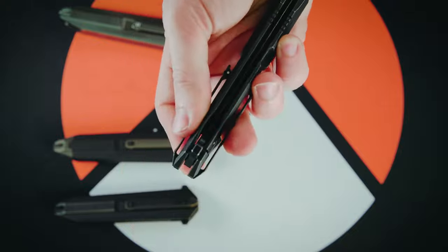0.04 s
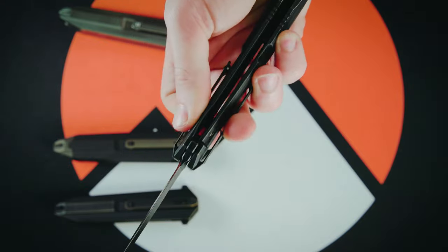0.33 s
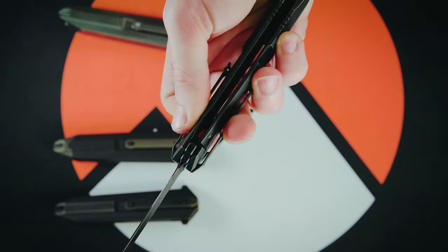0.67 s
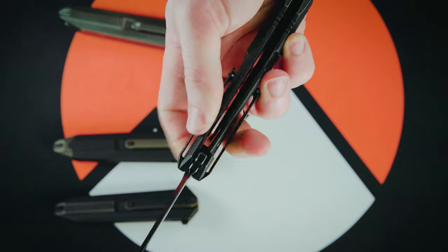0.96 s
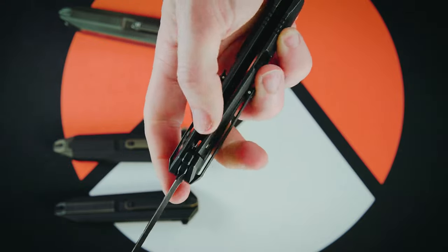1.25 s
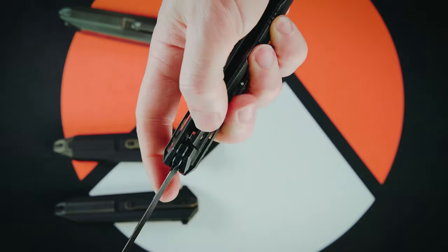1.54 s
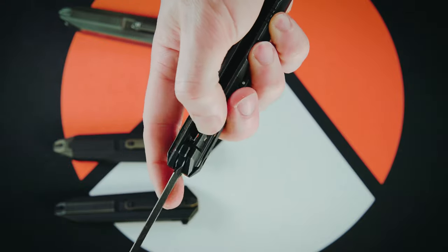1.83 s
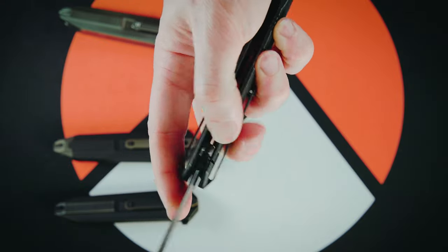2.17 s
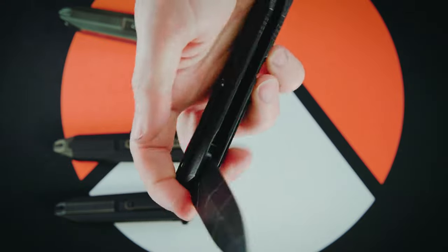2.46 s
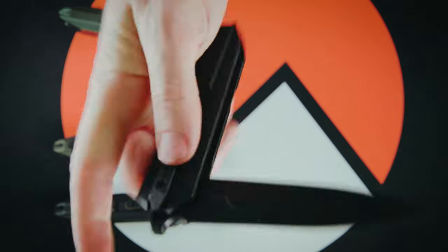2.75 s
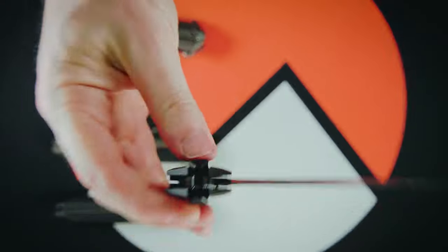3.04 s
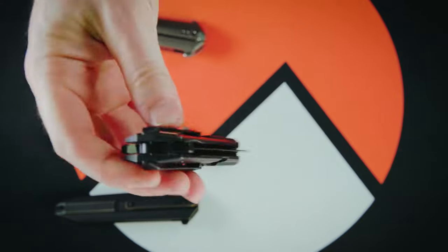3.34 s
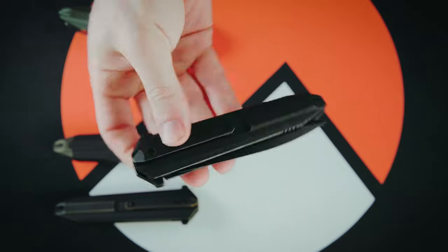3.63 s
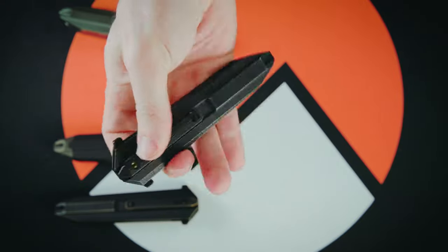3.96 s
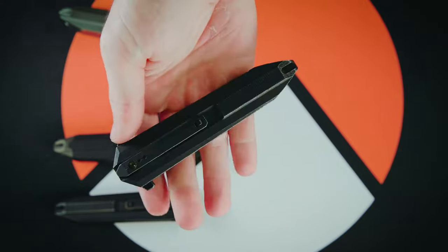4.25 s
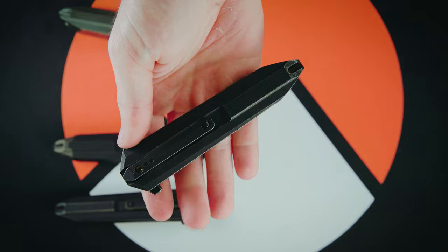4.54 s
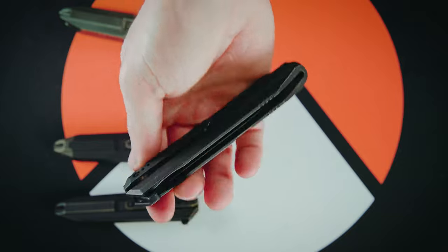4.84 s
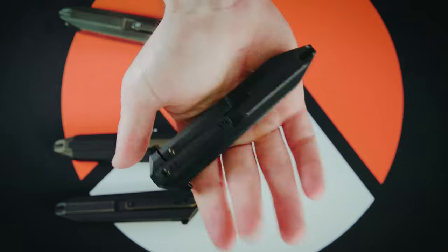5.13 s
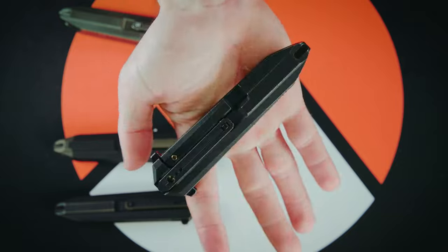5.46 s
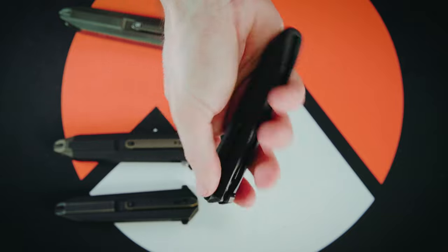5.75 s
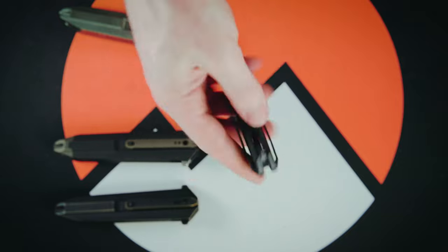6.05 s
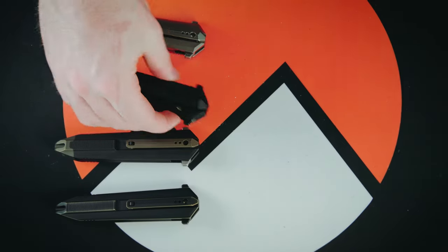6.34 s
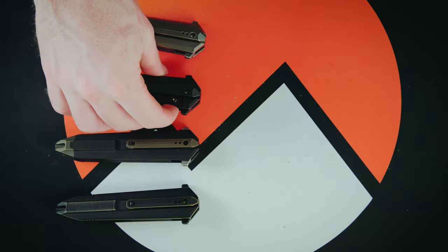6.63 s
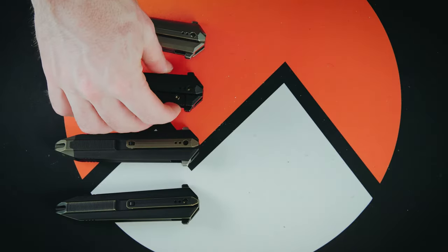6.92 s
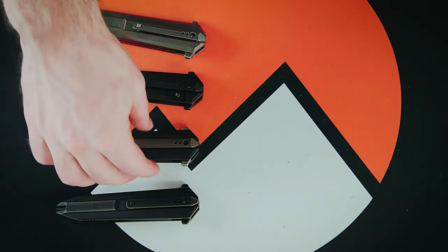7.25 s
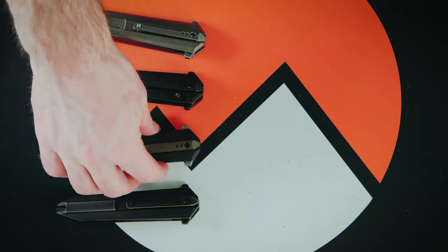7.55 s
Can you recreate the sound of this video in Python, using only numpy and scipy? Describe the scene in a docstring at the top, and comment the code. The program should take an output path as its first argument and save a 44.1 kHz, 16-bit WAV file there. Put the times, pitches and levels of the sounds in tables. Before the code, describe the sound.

A folding knife is handled close to the microphone in a quiet, bare room, with a faint low hum and a distant drone throughout. At about 0.2 seconds the blade swishes briefly and snaps open with a sharp, ringing steel click and a short room echo. Fingers tick lightly on the handle. At 1.9 seconds the lock is pushed aside with a smaller metallic click, followed by soft rubs and ticks. At 3.2 seconds the blade swings shut with a loud snap, and at 3.9 seconds another sharp click presses it home. Only faint finger rubbing and small taps follow. From about 6.7 seconds the knife is laid on a padded table with soft, low thuds and light ticks. Around 7.5 seconds a few more gentle thuds and clicks sound as another knife is touched.

```python
"""A folding knife, close to the microphone in a quiet, bare room; a low hum and a distant drone run throughout.
At 0.2 s the blade swishes round its pivot and snaps open, steel ringing on steel. At 1.9 s the lock
is pushed aside; at 3.2 s the blade swings home, and at 3.9 s it is pressed shut. Fingers rub and tick
on the handle in between and afterwards. From 6.7 s the knife is laid on a padded table with soft
thuds, and the next one is touched."""
import sys
import numpy as np
from scipy import signal
from scipy.fft import rfft, irfft
from scipy.io import wavfile
from scipy.ndimage import uniform_filter1d

SR = 44100
rng = np.random.default_rng(int(sys.argv[2]) if len(sys.argv) > 2 else 0)


def store_pcm(level_fs):
    """Save levels as 16-bit WAV."""
    pcm = np.round(np.clip(level_fs, -1, 1) * 32767).astype(np.int16)
    wavfile.write(sys.argv[1], SR, np.atleast_2d(pcm).T)


N = 334719
TIME = np.arange(N) / SR
BINS_HZ = np.fft.rfftfreq(8192, 1 / SR)


def from_db(db):
    """Decibels to gain."""
    return 10 ** (np.asarray(db) / 20)


def unit_energy(x):
    """Scale to a sum of squares of one."""
    return x / np.sqrt(np.sum(x ** 2) + 1e-20)


def add(track, s, sound):
    """Mix a sound into a track at a time."""
    stretch = track[int(round(s * SR)):][:len(sound)]
    stretch += sound[:len(stretch)]


def through(x, response):
    """Pass a signal through an impulse response."""
    return signal.oaconvolve(x, response)[:N]


def spectrum(points):
    """Gains at BINS_HZ from (f/Hz, level/dB) points joined on a log-frequency axis."""
    hz, db = np.transpose(points)
    return from_db(np.interp(np.log(np.maximum(BINS_HZ, 1)), np.log(hz), db))


def resonances(modes):
    """Gains at BINS_HZ of steep-sided resonances (f/Hz, half-width/Hz, level/dB)."""
    peaks = (from_db(db) / (1 + ((BINS_HZ - hz) / width) ** 2) for hz, width, db in modes)
    return np.sqrt(sum(peak ** 2 for peak in peaks))


def causal(gains):
    """Minimum-phase response of unit energy, shaped by gains at BINS_HZ."""
    cepstrum, half = irfft(np.log(gains + 1e-9)), len(gains) - 1
    cepstrum[1:half] *= 2
    cepstrum[half + 1:] = 0
    return unit_energy(irfft(np.exp(rfft(cepstrum))))


def excite(drive, gains, smooth_bins=45):
    """A burst rings a body; its spectrum is evened out, so the body sets the timbre."""
    power = np.abs(rfft(drive, 2 * len(BINS_HZ) - 2)) ** 2
    ripple = np.sqrt(uniform_filter1d(power, smooth_bins) + 1e-18)
    ringing = signal.fftconvolve(drive, causal(gains / ripple))
    return np.linalg.norm(drive) * unit_energy(ringing)


def swell(peak_s, length_s, ease):
    """A gain that rises to one and falls, above one half for length_s; more ease, shorter skirts."""
    return 1 / (1 + np.abs(2 * (TIME - peak_s) / length_s) ** (2 * ease))


def drift(rate_hz):
    """Slow random motion with a spread near one."""
    return np.interp(TIME * rate_hz % 63, np.arange(64), rng.standard_normal(64))


def wavering_tone(hz, waver):
    """A steady or gliding tone that wavers in level and phase; rms near one."""
    wobble = (1 + waver * (drift(5.9) + 1j * drift(3.5))) / np.sqrt(1 + waver ** 2)
    cycles = np.cumsum(hz * np.ones(N)) / SR + rng.random()
    return np.sqrt(2) * np.real(wobble * np.exp(2j * np.pi * cycles))


# appliance hum in the room: [f/Hz, rms level/dB, waver/0-1]
HUM_LINES = [(59.3, -56.5, .12), (119.7, -73.5, .6), (216.5, -79, .5), (239.3, -69, .45), (360.4, -85, .4),
             (473, -79.5, .5)]


def hum():
    """An appliance hums in a few low, wavering tones."""
    return sum(from_db(db) * wavering_tone(hz, waver) for hz, db, waver in HUM_LINES)


# speed of the far-off drone: [t/s, turns per second/Hz]
DRONE_SPEED = [(0, 19.3), (2.2, 20.45), (3.3, 21), (4.6, 20.95), (6.5, 20.3)]
# its partials: [multiple of the speed, steady level/dB, level of the added swell/dB]
DRONE_PARTIALS = [(2, -78, -78), (3, -61.5, -85), (4, -67.5, -66), (5, -72, -64.5), (7, -86, -75)]


def drone():
    """A low drone, like a distant engine, swells once, speeds up a little and eases."""
    speed = np.interp(TIME, *np.transpose(DRONE_SPEED))
    rise = swell(peak_s=2.1, length_s=1.7, ease=1.5)
    return sum((from_db(db) + from_db(swell_db) * rise) * wavering_tone(order * speed, waver=.25)
               for order, db, swell_db in DRONE_PARTIALS)


# room tone at the microphone: [f/Hz, relative level/dB]
AIR_SPECTRUM = [(15, -64), (25, -50), (40, -23.5), (64, -13.5), (87, -19.5), (120, -23), (149, -26),
                (206, -26), (242, -24.5), (384, -32.5), (476, -32.5), (754, -38), (911, -40), (1610, -45),
                (4000, -47.5), (16000, -51.5)]


def room_tone(hiss_db=-73.5):
    """Steady rumble and hiss; hiss_db is the rms of the part above 1 kHz."""
    air = through(rng.standard_normal(N), causal(spectrum(AIR_SPECTRUM)))
    hiss = signal.sosfilt(signal.butter(4, 1000, "high", fs=SR, output="sos"), air)
    return from_db(hiss_db) * air / hiss.std()


def friction(grain_db):
    """Surface grains catch and let go: noise of rms one whose level jumps every 32 samples."""
    roughness = np.repeat(rng.standard_normal(N // 32 + 1), 32)[:N]
    grains = rng.standard_normal(N) * from_db(grain_db * roughness)
    return grains / grains.std()


# colour of the pivot close up, opening and closing: [f/Hz, half-width/Hz, relative level/dB]
PIVOT_OPENING_MODES = [(2160, 49, 1), (3750, 120, -4.5), (4030, 170, 4), (4950, 300, -7), (6230, 380, -1),
                       (8250, 6000, -19.5), (11500, 350, -15)]
PIVOT_CLOSING_MODES = [(2200, 130, -1), (4100, 330, -0.5), (5000, 350, -1), (6550, 220, 2),
                       (7000, 4500, -11.5), (11500, 200, 2), (13200, 500, -8)]


def pivot(modes, start_s, stop_s, run_up_s, full_speed_db, grain_db):
    """The detent ball drags on the turning blade, louder as it speeds up, until the blade stops."""
    speed = np.clip((TIME - start_s) / run_up_s, 0, 1) * (TIME < stop_s)
    drag = friction(grain_db) * from_db(full_speed_db) * speed ** 1.9
    return through(drag, causal(resonances(modes)))


def chatter(t60, size=4096):
    """A dying burst of microscopic impacts with unit energy."""
    return unit_energy(rng.uniform(-1, 1, size) * from_db(-60 * TIME[:size] / t60))


# touches of fingers and parts: [t/s, tap level/dB, ring level/dB, favoured f/Hz, t60/s]
FINGER_TOUCHES = [(.167, -34, -24, 6400, .02), (.2005, -35, -15, 4150, .015), (.2075, -32, -12, 4150, .03),
                  (.907, -39, -35, 4215, .031), (.93, -43, -40, 5810, .055), (1.115, -56, -45.5, 4220, .13),
                  (1.581, -36.5, -44, 2383, .036), (1.889, -32, -31, 2700, .037),
                  (1.8914, -32, -21.5, 2710, .035), (2.134, -42.5, -36.5, 4030, .02),
                  (2.18, -42, -37.5, 2185, .07), (2.306, -43, -35, 4260, .022),
                  (2.387, -48, -36, 2170, .12), (2.672, -42, -41, 6470, .033),
                  (2.687, -37.5, -35, 8000, .026), (2.897, -50, -43, 5620, .047),
                  (3.74, -50, -42, 6300, .045), (5.667, -55, -45, 5340, .015), (5.81, -52, -46, 1680, .04),
                  (5.879, -53, -45, 1680, .03), (6.118, -46, -48, 3600, .05),
                  (6.171, -42.5, -41, 8200, .065), (6.236, -47, -44, 4110, .02),
                  (6.481, -48.5, -39, 4100, .012), (6.892, -34.5, -53, 4200, .13),
                  (6.924, -41, -55, 5700, .1), (6.966, -42, -47, 1290, .024),
                  (7.474, -31.5, -45.5, 4130, .1), (7.531, -36.5, -35, 5400, .13),
                  (7.568, -37.5, -39, 1490, .023)]
# colour of a dry tap: [f/Hz, relative level/dB]
TAP_SPECTRUM = [(200, -8.5), (500, -4), (1200, 2.5), (2500, 0), (4200, 2.5), (6000, -4.5), (8500, -10),
                (12000, -19), (16000, -29)]
# light ringing of the handle: [f/Hz, half-width/Hz, relative level/dB]
HANDLE_RING = [(2200, 46, -8.5), (3600, 400, -11), (4080, 85, 1.5), (4350, 110, -2), (5432, 170, -6),
               (6260, 120, -5.5), (8060, 740, -15)]


def finger_ticks(ping_width_hz=67, ping_db=9.5):
    """Each touch gives a dry tap and rings the handle, favouring one partial."""
    out, handle, tap = np.zeros(N), resonances(HANDLE_RING), spectrum(TAP_SPECTRUM)
    for s, tap_db, ring_db, hz, t60 in FINGER_TOUCHES:
        burst = chatter(t60)
        ping = resonances([(hz, ping_width_hz, ping_db)])
        add(out, s, from_db(tap_db) * excite(burst, tap))
        add(out, s, from_db(ring_db) * excite(burst, handle + ping))
    return out


# decay of the bare room: [f/Hz, t60/s]
ROOM_DECAY = [(100, .5), (500, 0.59), (1200, .72), (4000, 0.63), (6000, .6), (8000, .51), (11000, .43),
              (16000, 0.37)]
# reflections gathering after the direct sound: [t/s, relative level/dB]
ROOM_ONSET = [(0, -31.5), (.005, -5.5), (.017, -7.5), (.03, 0.5), (.045, 1), (.09, 0.5)]


def room(x):
    """Diffuse reflections gather at the microphone within 30 ms and die soonest in the top treble."""
    t, hz = TIME[:SR], np.fft.rfftfreq(SR, 1 / SR)
    onset = from_db(np.interp(t, *np.transpose(ROOM_ONSET)))
    centres, decays = np.transpose(ROOM_DECAY)
    white, tail = rfft(rng.standard_normal(SR)), 0
    for t60, share in zip(decays, np.eye(len(centres))):
        band = irfft(white * np.interp(hz, centres, share))
        tail = tail + band * unit_energy(from_db(-60 * t / t60) * onset)
    return through(x, unit_energy(tail))


# steel contacts of each action: [t/s, level/dB, chatter t60/s]
OPEN_CONTACTS = [(.2171, 4.5, 0.01), (.2197, 8.5, 0.013), (.2222, 8, 0.012), (.2255, -9, 0.01)]
UNLOCK_CONTACTS = [(1.8975, -22, .03), (1.9004, -8, .012), (1.9017, -3.5, 0.015), (1.9042, -6.5, 0.018)]
CLOSE_CONTACTS = [(3.2057, 11.2, 0.0099), (3.2072, -2.5, .035)]
SEAT_CONTACTS = [(3.8672, -33.5, .08), (3.8709, 7, .007), (3.8728, -2, .035), (3.8748, -1, .035),
                 (3.8771, -3, .035), (3.8838, -15.5, .025)]
# ringing of the open knife, the lock bar, the folded knife and the blade in its seat:
# [f/Hz, half-width/Hz, relative level towards the microphone/dB, relative level into the room/dB]
OPEN_RING = [(610, 320, -24.5, -37.5), (980, 180, -15, -19), (1730, 250, -11.5, -12.5),
             (2200, 82, -10.5, -17), (2600, 200, -12.5, -8), (3680, 300, -5.5, -0.5), (4220, 150, -6, -1.5),
             (4720, 560, -19, -7.5), (5700, 550, -8.0, -4), (6290, 160, -1.0, -3.5),
             (6620, 150, -3.0, -5.5), (7370, 150, -10, -8), (8083, 160, -8.5, -5.5),
             (8830, 470, -11.5, -10.5), (10000, 470, -13.0, -18.0), (11100, 290, -17.5, -21),
             (11700, 730, -20.5, -20.0), (13320, 1060, -32.0, -30.5), (14800, 590, -28.5, -30.5)]
LOCK_RING = [(410, 93, -33, -31), (1570, 280, -26.5, -18.5), (2250, 145, -8.5, -8.5),
             (2750, 310, -13.5, -11), (3610, 180, -10, -5.5), (4200, 110, -5, -2.5), (4530, 150, -0.5, 2.5),
             (4840, 150, -10, -0.5), (5660, 300, -8.5, -8), (6500, 890, -19.5, -17.0),
             (7480, 170, -21.5, -17.5), (8180, 320, -16, -17.5), (9640, 1020, -29, -27.5),
             (11680, 690, -34.0, -34.0), (12820, 750, -35.0, -31.5)]
FOLDED_RING = [(695, 3300, -27, -24.5), (1115, 180, -17, -18), (2122, 320, -16, -18.5),
               (3330, 440, -13, -15), (3790, 90, -60.0, -0.5), (3970, 200, -6, -1.5), (4930, 180, -8, -1.5),
               (5170, 120, -8, -6.5), (5885, 150, -3.5, -6.0), (6990, 600, -4.5, -8.5),
               (7220, 172, -1, -19), (7900, 190, -7.5, -58), (8650, 690, -10.5, -14),
               (9956, 560, -16.5, -26), (11600, 1150, -19, -25.0), (13340, 120, -28, -23.5),
               (14620, 1200, -32, -33.5)]
SEAT_RING = [(390, 320, -28, -24.5), (1210, 80, -18, -17.5), (2120, 1100, -23, -24.5), (3140, 99, -20, -30),
             (3660, 155, -6, -5.0), (4200, 74, 1.5, -60.0), (4270, 310, -60.0, -0.5), (4540, 126, -6, -2.5),
             (5940, 620, -15, -8), (6100, 190, -10.5, -60.0), (6770, 145, -8.5, -28), (7860, 650, -11, -13),
             (8480, 120, -13, -18), (9880, 590, -23.5, -25), (11500, 660, -20.5, -24),
             (12490, 320, -25.5, -26.0), (13000, 450, -20, -23.0), (14700, 760, -35, -34.0)]


def snap(contacts, modes, room_db, tick_db):
    """Steel hits steel close up: each contact, a tick and a chatter, rings the knife; the room answers."""
    start, drive = contacts[0][0], np.zeros(4096)
    for s, db, t60 in contacts:
        blow = chatter(t60)
        blow[0] += from_db(tick_db) * rng.choice([-1, 1])
        add(drive, s - start, from_db(db) * unit_energy(blow))
    hz, width, near_db, far_db = np.transpose(modes)
    near, far = np.zeros((2, N))
    add(near, start, excite(drive, resonances(zip(hz, width, near_db))))
    # the room gathers sound from all directions, which fills the notches between the contacts
    add(far, start, excite(drive, resonances(zip(hz, width, far_db)), smooth_bins=13))
    return near + from_db(room_db) * room(far)


# knocks in the palm: [t/s, f/Hz, level/dB, t60/s]
PALM_KNOCKS = [(.2195, 233.3, -44.5, .05), (3.206, 238.4, -46.5, 0.078), (3.207, 120, -51, .04),
               (3.874, 272, -43, 0.094), (3.903, 149, -41, 0.034)]


def recoil():
    """The handle recoils into the flesh of the hand with short, dull knocks."""
    out, t = np.zeros(N), TIME[:SR // 2]
    for s, hz, db, t60 in PALM_KNOCKS:
        add(out, s, from_db(db - 60 * t / t60) * np.sin(2 * np.pi * hz * t))
    return out


# fingers sliding on the handle: [fastest moment t/s, level/dB, length/s]
FINGER_SLIDES = [(2.395, -64, .075), (2.55, -80, .05), (2.76, -77, .09), (2.885, -72, .045),
                 (3.01, -78, .04), (4.695, -74, .09), (5.745, -73.5, .12), (6.16, -74, .14),
                 (6.275, -74, .06), (6.51, -79, .1), (7.29, -76, .05), (7.46, -76, .08), (7.54, -62, .025)]
# partials rung by a slip of the skin: [f/Hz, half-width/Hz, relative level/dB]
SLIP_RING = [(4110, 70, 0), (5380, 120, -10), (8200, 1200, -22)]


def finger_rubs(slips_per_s=24, slip_db=27, spread_db=3):
    """Sliding skin rubs the handle, sticking and slipping at random; the pings scale with the slide."""
    sliding = sum(from_db(db) * swell(s, length, ease=2) for s, db, length in FINGER_SLIDES)
    rub = through(friction(grain_db=3) * sliding, causal(resonances(HANDLE_RING)))
    slips = rng.random(N) < slips_per_s / SR
    strength = sliding * from_db(slip_db + spread_db * rng.uniform(-1, 1, N))
    return rub + through(slips * strength, causal(resonances(SLIP_RING)))


# knife and hand meeting the padded table: [t/s, level/dB, contact length/s]
TABLE_BLOWS = [(6.693, -50.5, 0.0035), (6.747, -52.5, 0.0044), (6.914, -42.5, .006), (6.929, -36.5, 0.0056),
               (6.966, -37, 0.0026), (7.09, -66, 0.0033), (7.404, -45.5, 0.0066), (7.473, -47, 0.0034),
               (7.571, -44.5, 0.0036)]
# modes of the table top: [f/Hz, relative level/dB, t60/s]
TABLE_RING = [(70.3, 0.5, 0.49), (139.6, 6.5, 0.17), (169, -2, .14), (241.2, 3, .14), (278.1, -6, 0.33),
              (349, -13.5, 0.23), (472, -7, 0.04), (820, 8, 0.01), (1064, 3, .025), (1420, 10.5, 0.017)]


def table_thuds():
    """The mat spreads each blow into a soft push that rings the table top."""
    force, t = np.zeros(N), TIME[:SR // 20]
    for s, db, length in TABLE_BLOWS:
        push = t * np.exp(-2 * np.pi * t / length)
        add(force, s, from_db(db) * push / push.sum())
    t = TIME[:SR]
    top = sum(from_db(db - 60 * t / t60) * np.sin(2 * np.pi * hz * t) for hz, db, t60 in TABLE_RING)
    return through(force, top)


def scene():
    """One microphone close to the hands; the knife moves, so each snap has its own reflections."""
    background = hum() + drone() + room_tone()
    swish = (pivot(PIVOT_OPENING_MODES, .154, .217, run_up_s=.017, full_speed_db=-38, grain_db=2)
             + pivot(PIVOT_CLOSING_MODES, 3.113, 3.2, run_up_s=.06, full_speed_db=-44, grain_db=.6))
    handling = finger_ticks() + finger_rubs()
    snaps = (snap(OPEN_CONTACTS, OPEN_RING, room_db=-2, tick_db=-9.5)
             + snap(UNLOCK_CONTACTS, LOCK_RING, room_db=-7.5, tick_db=-14)
             + snap(CLOSE_CONTACTS, FOLDED_RING, room_db=-7.8, tick_db=-10)
             + snap(SEAT_CONTACTS, SEAT_RING, room_db=-10, tick_db=-6.5))
    thuds = recoil() + table_thuds()
    reflections = room(from_db(-9.5) * swish + from_db(-10) * handling + from_db(-9) * thuds)
    return (background + swish + handling + snaps + thuds + reflections)[None]


def record(dry):
    """The microphone drops the deepest rumble, the sharpest peaks are rounded and the top is cut."""
    low_cut_hz, high_cut_hz, ceiling = 42, 15900, 0.43
    thinned = signal.sosfilt(signal.butter(4, low_cut_hz, "high", fs=SR, output="sos"), dry)
    rounded = ceiling * np.tanh(thinned / ceiling)
    return signal.sosfilt(signal.ellip(10, .1, 70, high_cut_hz, fs=SR, output="sos"), rounded)


dry = scene()
out = record(dry)
store_pcm(out)
```